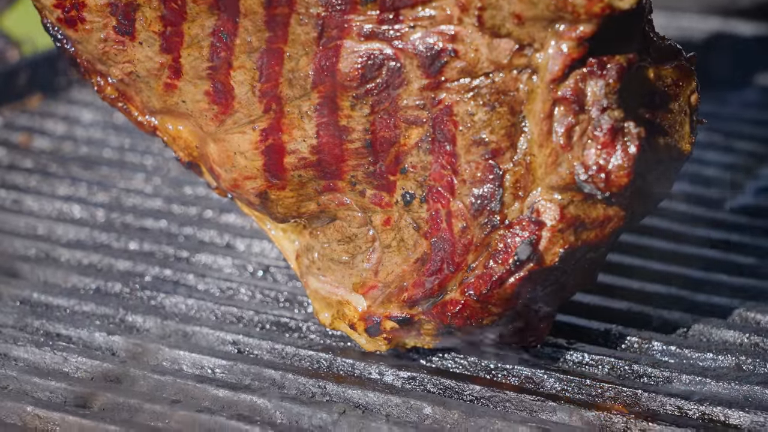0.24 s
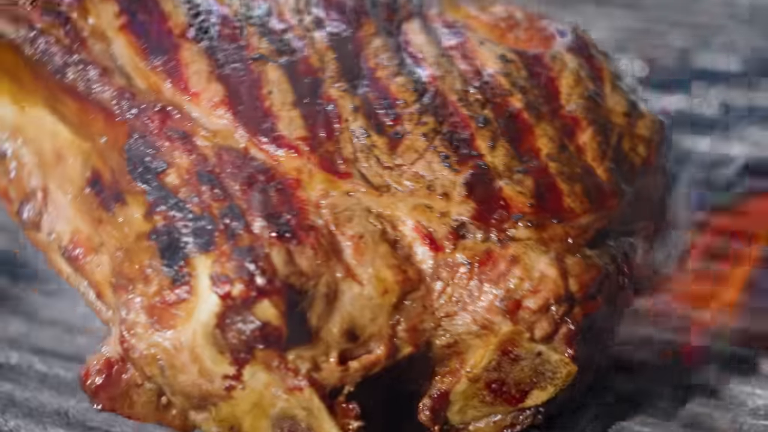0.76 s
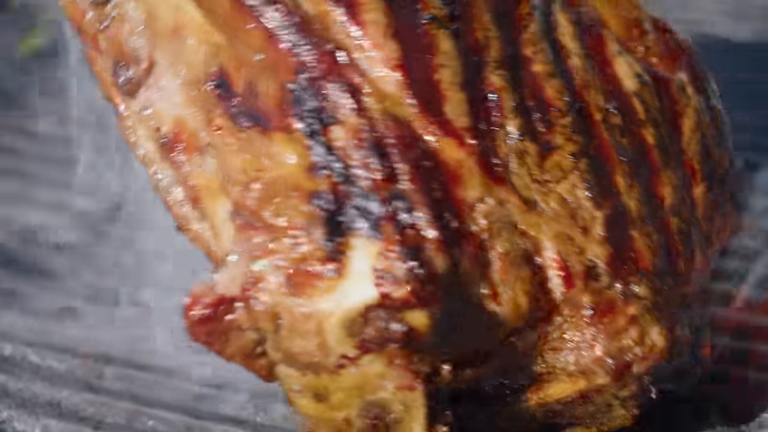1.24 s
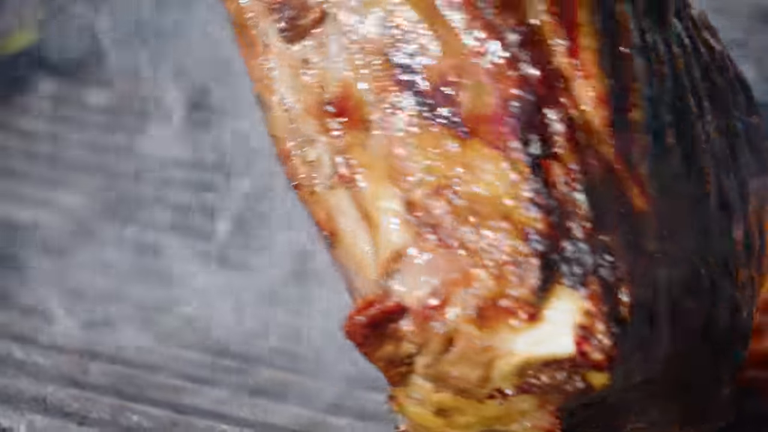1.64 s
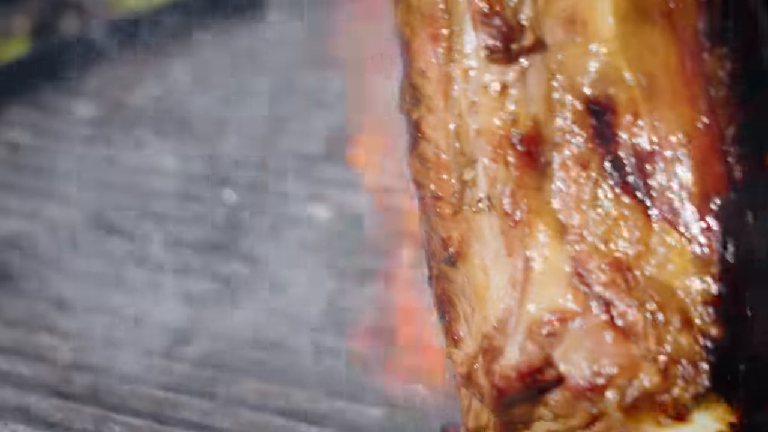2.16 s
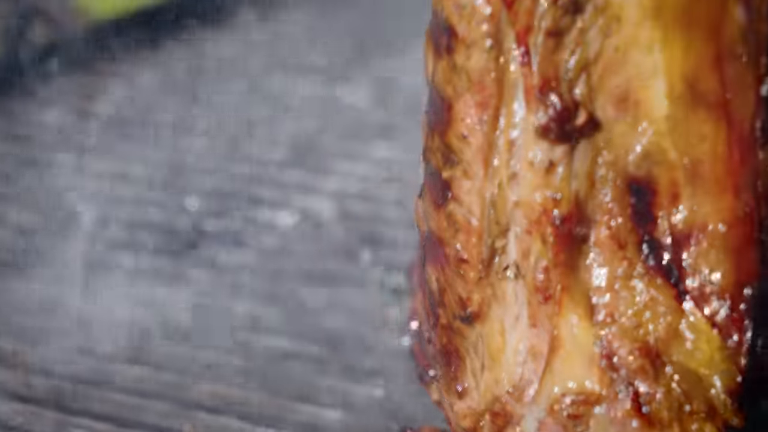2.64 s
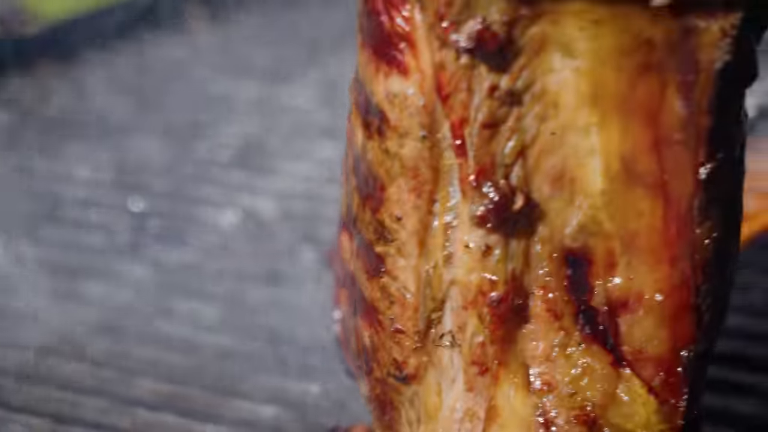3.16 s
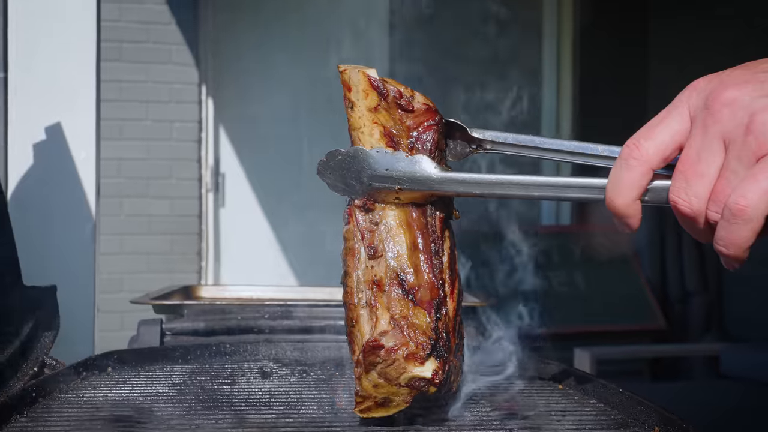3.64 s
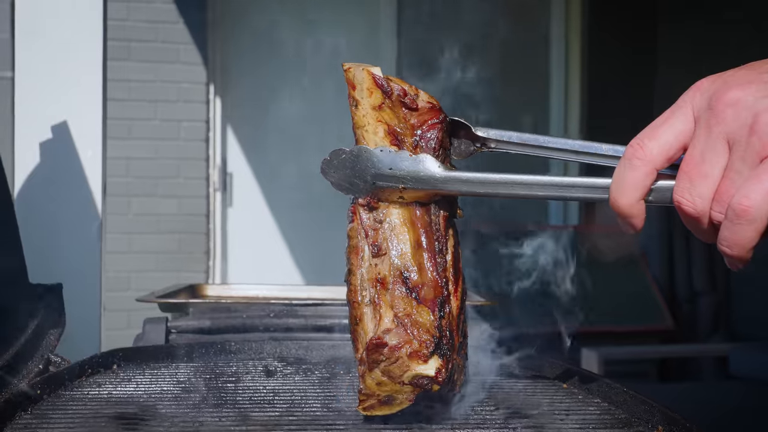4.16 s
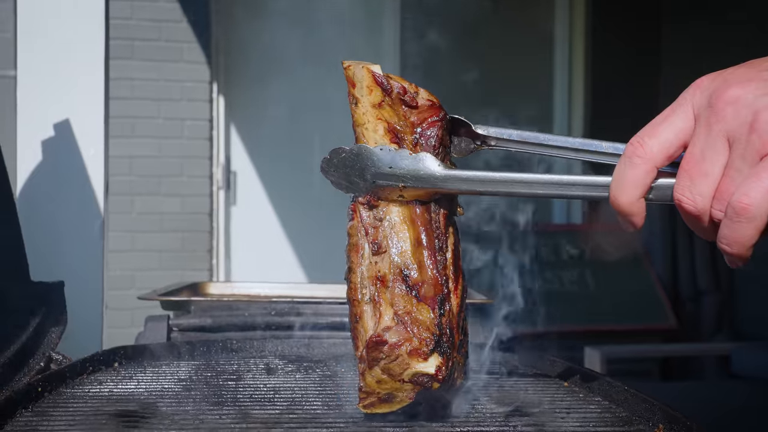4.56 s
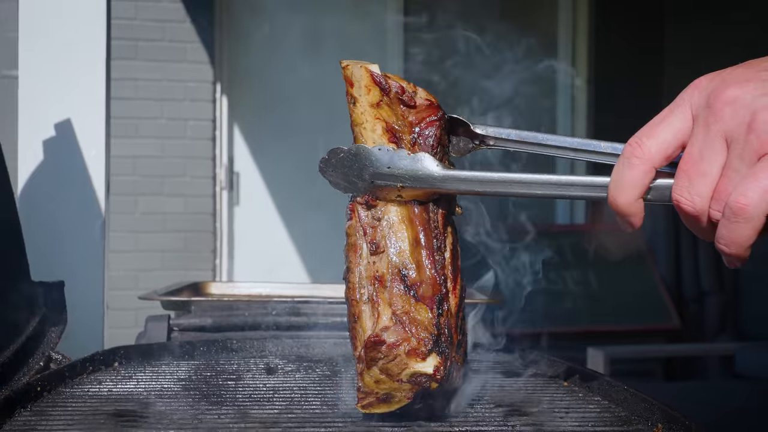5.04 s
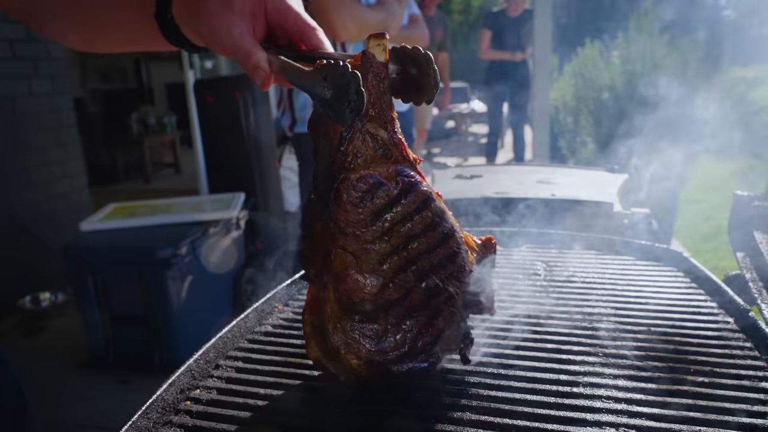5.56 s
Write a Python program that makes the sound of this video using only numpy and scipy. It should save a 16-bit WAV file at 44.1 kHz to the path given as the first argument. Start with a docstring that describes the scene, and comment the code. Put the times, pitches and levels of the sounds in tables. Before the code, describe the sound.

A thick piece of meat sizzles close to the microphone on a hot outdoor barbecue grill. Its juices hiss and fizz steadily while fine droplets crackle on the bars. Sharp pops of spitting fat come often at first, thin out through the middle, then bunch into a stronger flurry near the end. Some land with a soft thump. The fire rumbles faintly underneath the whole time.

```python
"""Meat sizzles close by on a hot kettle grill outdoors: thousands of steam bubbles burst in its juices,
each a damped cavity resonance. Fine droplets crackle on the bars as a random train of impulses,
and water trapped in fat explodes in sharp spits that excite the modes of the grill.
A soft low thump comes with the bigger spits. Below, the turbulent fire rumbles."""
import sys
import numpy as np
from scipy import signal
from scipy.fft import rfft, irfft, next_fast_len
from scipy.io import wavfile
from scipy.ndimage import uniform_filter1d

SR = 44100
rng = np.random.default_rng(int(sys.argv[2]) if len(sys.argv) > 2 else 0)


def put_to_file(sound):
    """Save the sound as 16-bit audio at rate SR, in the file named by the first command-line argument."""
    columns = np.atleast_2d(sound).T  # one column per channel
    safe = np.clip(columns, -1, 1)
    whole_steps = np.round(safe * 32767)
    wavfile.write(sys.argv[1], SR, whole_steps.astype(np.int16))


N = 256220
TIME = np.arange(N) / SR


# Spectral envelope of the boiling juice: f/Hz, relative level/dB
SIZZLE_SPECTRUM = [(150, -14.5), (300, -14), (450, -8), (650, -3.5), (900, 1), (1200, 0), (1600, 1.5),
                   (2200, 1.5), (3300, 1.5), (4200, -3), (5200, -8.5), (6100, -13), (7000, -17.5)]
# Runs of juice boiling up in swarms of bubbles: t/s, half duration/s, f/Hz, rise/dB
BUBBLE_SWARMS = [(0.524, 0.037, 3180, 6.5), (1.234, 0.015, 3000, 8.5), (2.692, 0.021, 3500, 9),
                 (3.037, 0.041, 2890, 7.5), (3.87, 0.068, 2400, 2.5), (4.476, 0.025, 2200, 5.5),
                 (4.802, 0.033, 3250, 5.5)]
def sizzle(spread_db=3.5, cycles=2.14, hiss_db=-4, patch_db=1.78, flutter_db=0.5, count=18000, bands=7):
    """Superposition: tiny bursting bubbles sum to a fizz; the smallest merge into a hiss of steam."""
    when, pitch, size, decay = rng.random((count, 4)).T
    start = (when * N).astype(int)
    hz = 500 * 15 ** pitch
    # every size of bubble comes and goes on its own
    band_drift = np.array([walk(16) for _ in range(bands)])
    swarm_db = patch_db * band_drift[(pitch * bands).astype(int), start]
    for s, half_s, centre_hz, rise_db in BUBBLE_SWARMS:
        swell = np.exp(-((start / SR - s) / half_s) ** 2)
        swarm_db += rise_db * swell * resonance(hz, centre_hz, 0.32 * centre_hz)
    gain = hz * undb(spread_db * np.minimum(-np.log(1 - size), 4.5) + swarm_db)
    lag = np.arange(256)
    grains = gain[:, None] * damped_sine(hz[:, None], cycles * (.5 + decay[:, None]), lag / SR)
    fizz = np.bincount((start[:, None] + lag).ravel(), grains.ravel(), N)[:N]
    hiss = undb(hiss_db) * tint(rng.standard_normal(N), SIZZLE_SPECTRUM)
    return unit(tint(fizz, SIZZLE_SPECTRUM) + hiss) * undb(flutter_db * walk(25.07))


# Single large bubbles in the juice: t/s, level/dB, f/Hz
LARGE_BUBBLES = [(0.4038, -29.5, 3000), (0.4510, -31.5, 1750), (0.548, -32.5, 3000), (1.1023, -32, 2180),
                 (1.2928, -32, 2630), (1.4046, -30.5, 3000), (1.4863, -38, 5850), (1.914, -32, 2700),
                 (2.5362, -35.5, 1530), (2.845, -32.5, 1850), (3.049, -37, 3420), (3.1910, -35, 3800),
                 (3.6760, -33.5, 3730), (4.1945, -38, 2620), (4.7289, -38, 4700), (5.0250, -26.5, 2930),
                 (5.422, -39.5, 4260)]
def bubbles(cycles=1.34, opening_s=0.00013):
    """Cavity resonance: a large bubble tears open and rings with a short pitched plip."""
    out, t = np.zeros(N), np.arange(1024) / SR
    for s, db, hz in LARGE_BUBBLES:
        plip = damped_sine(hz, cycles, t) * (1 - np.exp(-t / opening_s))
        add(out, s, scatter(plip, near=0.098, near_s=0.0037, far=0.012, far_s=0.0079), db)
    return out


# Spectral envelope of the snapping droplets: f/Hz, relative level/dB
CRACKLE_SPECTRUM = [(200, 9), (500, 8.5), (1000, 16.5), (2100, 15.5), (3500, -10.5), (6000, 0.5),
                    (8000, -5), (9500, -14.5), (11000, -22), (12200, -33)]
# Fat running onto the bars: t/s, relative crackle level/dB
FAT_FLOW = [(0.0, -76), (0.48, -74), (1.0, -69), (1.16, -72.5), (1.68, -77), (1.97, -73.5), (2.34, -77.5),
            (2.99, -81), (3.54, -72), (4.61, -78.5), (5.36, -67.5), (5.81, -74)]
def crackle(gain_db=22.5, spread_db=5, mist_db=-7, cluster_db=1.5, spray_share=0.35, count=2400):
    """Shot noise: fine droplets snap on the hot bars in clusters, over a mist of still smaller ones."""
    when, size = rng.random((count, 2)).T
    gain = undb(spread_db * np.minimum(-np.log(1 - size), 4))
    clicks = np.bincount((when * N).astype(int), gain * rng.choice([-1, 1], count), N)
    t = np.arange(1024) / SR
    spray_power = np.abs(signal.fftconvolve(clicks ** 2, np.exp(-t / 0.00058))[:N])
    spray = spray_share * np.sqrt(spray_power) * rng.standard_normal(N)
    snaps = tint((clicks + spray) * undb(cluster_db * walk(40)), CRACKLE_SPECTRUM)
    mist = undb(mist_db) * tint(rng.standard_normal(N), CRACKLE_SPECTRUM)
    running_fat = undb(follow(FAT_FLOW) + gain_db)
    return unit(snaps + mist) * np.hypot(running_fat, spatter())


# Spectral envelope common to all spits: f/Hz, relative level/dB
SPIT_SPECTRUM = [(60, -28), (250, 0.5), (500, -13), (900, 0), (2100, -2.5), (3500, -1.5), (6000, -6),
                 (9000, -14), (12000, -32.5)]
# Modes of the grill: f/Hz, half width/Hz, weight
GRILL_MODES = [(1540, 55, 0.71), (2115, 155, 1.0)]
# Spits of fat: t/s, level/dB, cavity f/Hz, cavity boost/dB, treble boost/dB, grill boost at weight 1/dB
FAT_SPITS = [(0.098, -29, 5170, 13, 5, 15), (0.1850, -25.5, 4350, 5.5, -10.5, 3),
             (0.3632, -26.5, 5350, 12, 21, 8), (0.496, -35, 3200, 4, -15, -4), (0.578, -38, 1600, 13, 2, 2),
             (0.6587, -34, 7600, 9, 14, 0), (0.7033, -22.5, 1540, 2, -7.5, 20.5),
             (0.7733, -31, 4530, 8, 2, 21), (0.9312, -22.5, 764, 14.5, -4, 14),
             (1.0513, -30.5, 6900, 9, 6, 14), (1.0747, -29.5, 4370, 14, 1, 11),
             (1.7947, -32.5, 6930, 13, -14, -7), (1.842, -30, 3680, 4.5, 11, 6),
             (2.273, -35.5, 1260, 22.5, 11, 0), (2.4277, -35.5, 7460, 10, -17, -2),
             (3.1779, -33, 6040, 11, -14, -6), (3.7090, -37, 7600, 2, 19, 0),
             (3.7795, -27.5, 2080, 6, 5.5, 7), (4.0712, -27.5, 5900, 5, -1, 2),
             (4.8536, -33.5, 5920, 15, -21, -6), (5.1205, -26, 7600, 7, -4.5, 9),
             (5.1873, -23, 3780, 14, -4, 6.5), (5.2762, -22.5, 5500, 10, -6, 8.5),
             (5.2956, -23.5, 6900, 10, -1, 8.5), (5.3310, -32.5, 7300, 7, -16, -9),
             (5.5480, -32, 5950, 6, -3, 6), (5.562, -34.5, 7740, 15, -15, 9),
             (5.5788, -28.5, 7200, 11, 1, 10), (5.6680, -27.5, 6040, 9.5, -8, 12),
             (5.7640, -30.5, 4630, 6.5, 3, -9)]
def spits(cavity_width=0.15):
    """Impulse excitation: water trapped in fat explodes, ringing its cavity and the grill."""
    out, hz = np.zeros(N), np.fft.rfftfreq(2048, 1 / SR)
    grill = sum(weight * resonance(hz, mode_hz, width_hz) for mode_hz, width_hz, weight in GRILL_MODES)
    treble = np.clip(np.log2((hz + 1) / 2000) / 2, 0, 1)
    for s, db, cavity_hz, ring_db, sharp_db, grill_db in FAT_SPITS:
        cavity = resonance(hz, cavity_hz, cavity_width * cavity_hz)
        boost_db = sharp_db * treble + ring_db * cavity + grill_db * grill
        crack = impulse(contour(SPIT_SPECTRUM, hz) + boost_db)
        add(out, s, scatter(crack, near=0.3, near_s=0.0021, far=0.031, far_s=0.011), db)
    return out


def spatter(relative_db=-30.5, power_decay_s=0.052, sharp_share=0.23):
    """Exponential decay of crackle gain as thrown fat fries away; hard, sharp spits throw the most."""
    power = np.zeros(N)
    for s, db, _, _, sharp_db, _ in FAT_SPITS:
        onset_power = undb(db + sharp_share * sharp_db + relative_db) ** 2
        power += (TIME > s) * onset_power * np.exp(-np.abs(TIME - s) / power_decay_s)
    return np.sqrt(power)


# Low thumps of the bigger spits: t/s, peak level/dB, initial f/Hz
SPIT_THUMPS = [(0.185, -30, 380), (0.363, -31, 400), (0.706, -32, 354), (0.931, -23.5, 380),
               (1.044, -34, 131), (3.18, -33, 272), (4.077, -26.5, 184), (5.277, -28.5, 420),
               (5.298, -19, 167), (5.332, -26, 168), (5.364, -33, 164), (5.58, -31, 225)]
def thumps(cycles=0.57, slowing_s=0.01):
    """Heavily damped oscillation: the soft low thump of a bigger spit, one or two slowing swings."""
    out, t = np.zeros(N), np.arange(4096) / SR
    for s, db, hz in SPIT_THUMPS:
        turns = hz * slowing_s * np.log(1 + t / slowing_s)
        thump = np.sin(2 * np.pi * turns) * turns * np.exp(-2 * turns / cycles)
        out += np.interp(TIME - s, t, undb(db) * thump / np.abs(thump).max(), left=0, right=0)
    return out


# The largest droplets landing on the bars: t/s, relative level/dB
DROPLET_TICKS = [(0.0126, -52.5), (1.011, -56), (1.157, -58), (1.548, -60), (1.975, -57.5), (2.182, -66),
                 (2.448, -56), (2.723, -60), (2.838, -53), (3.125, -57), (3.556, -55), (5.287, -49)]
def ticks(gain_db=-2, cycles=3.2, ring_hz=8300):
    """Flash evaporation: a droplet turns to steam on a bar with a thin, bright tick."""
    out = np.zeros(N)
    tick = damped_sine(ring_hz, cycles, np.arange(512) / SR)
    for s, db in DROPLET_TICKS:
        add(out, s, scatter(tick, near=0.12, near_s=0.0016, far=0.02, far_s=0.0044), db + gain_db)
    return out


# Spectral envelope of the fire: f/Hz, relative level/dB
FIRE_SPECTRUM = [(15, -34), (28, -9.5), (42, 0), (62, 2), (85, 0), (115, -2), (160, -2.5), (220, -7.5),
                 (300, -8), (420, -18.5), (800, -45), (3000, -90)]
# Strength of the fire: t/s, relative level/dB
FIRE_STRENGTH = [(0.0, -51), (0.11, -50.5), (0.95, -49.5), (1.42, -52), (1.58, -53.5), (3.2, -51.5),
                 (3.35, -50.5), (4.26, -46.5), (4.4, -51.5), (5.18, -47), (5.57, -48), (5.81, -48)]
def fire(gain_db=2, flicker_db=1.9):
    """Turbulence: hot gas churns over the coals and radiates low-frequency noise."""
    rumble = tint(rng.standard_normal(N), FIRE_SPECTRUM)
    return rumble * undb(follow(FIRE_STRENGTH) + gain_db + flicker_db * walk(14))


def damped_sine(hz, cycles, t):
    """Free vibration of a damped oscillator, falling to 1/e after the given cycles."""
    return np.sin(2 * np.pi * hz * t) * np.exp(-hz * t / cycles)


def resonance(hz, centre_hz, half_width_hz):
    """Lorentzian resonance curve of height 1."""
    return 1 / (1 + ((hz - centre_hz) / half_width_hz) ** 2)


def scatter(sound, near, near_s, far, far_s):
    """Scattering: direct sound, dense reflections from meat and bars, then a faint tail from the bowl."""
    t = np.arange(len(sound)) / SR
    echoes = rng.standard_normal(len(t)) * (near * np.exp(-t / near_s) + far * np.exp(-t / far_s))
    echoes[0] = 1
    return signal.fftconvolve(sound, echoes)


def impulse(db):
    """Minimum phase: the sharpest causal click that has this spectrum."""
    cepstrum = irfft(np.log(undb(db)))
    half = len(cepstrum) // 2
    cepstrum[1:half] *= 2
    cepstrum[half + 1:] = 0
    return irfft(np.exp(rfft(cepstrum)))


def contour(spectrum, hz):
    """Spectral envelope in dB, interpolated over log frequency."""
    f, db = np.transpose(spectrum)
    return np.interp(np.log(hz + 1), np.log(f), db)


def tint(x, spectrum):
    """Linear filtering by a spectral envelope, scaled to rms 1."""
    size = next_fast_len(N)
    gain = undb(contour(spectrum, np.fft.rfftfreq(size, 1 / SR)))
    return unit(irfft(rfft(x, size) * gain, size)[:N])


def lowpass(x, hz):
    """Steep elliptic low-pass."""
    return signal.sosfilt(signal.ellip(10, .2, 70, hz, fs=SR, output="sos"), x)


def walk(rate_hz):
    """Random modulation: held values, smoothed twice, with a spread near 1."""
    hold = max(int(SR / rate_hz), 2)
    steps = np.repeat(rng.standard_normal(N // hold + 1), hold)
    return 1.3 * uniform_filter1d(uniform_filter1d(steps, hold), hold)[:N]


def follow(curve):
    """Linear interpolation of a level over time."""
    return np.interp(TIME, *np.transpose(curve))


def add(out, s, sound, db):
    """Mix in a transient at its equivalent level: its energy spread over 5 ms."""
    start = int(s * SR)
    sound = sound * undb(db) * np.sqrt(.005 * SR / np.sum(sound ** 2))
    out[start:start + len(sound)] += sound[:N - start]


def undb(db):
    """Decibels to amplitude ratio."""
    return 10 ** (np.asarray(db) / 20)


def unit(x):
    """Scale to rms 1."""
    return x / np.sqrt(np.mean(x ** 2))


def scene(sizzle_db=-39):
    """Superposition of steadily boiling juice, snapping fat and the fire below, in mono."""
    # the sizzle and bubbles are cut off above 7 kHz; crackle and spits reach higher
    juice = lowpass(sizzle() * undb(sizzle_db) + bubbles(), hz=7000)
    fat = crackle() + ticks() + spits() + thumps()
    return (juice + fat + fire())[None]


def record(dry):
    """Band limiting: the highest treble is cut off."""
    return lowpass(dry, hz=12100)


dry = scene()
out = record(dry)
put_to_file(out)
```